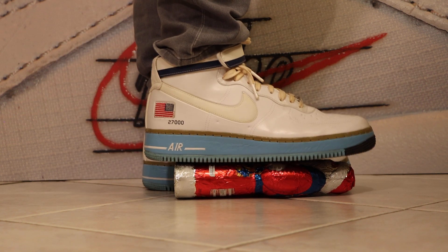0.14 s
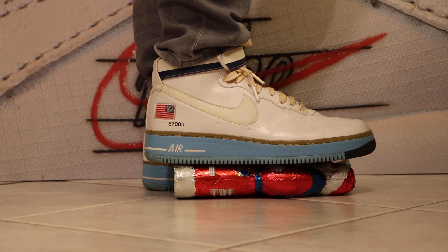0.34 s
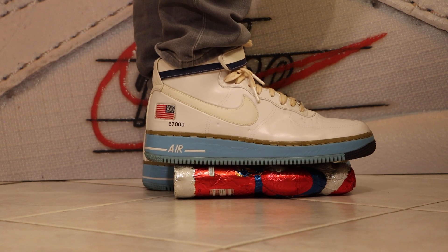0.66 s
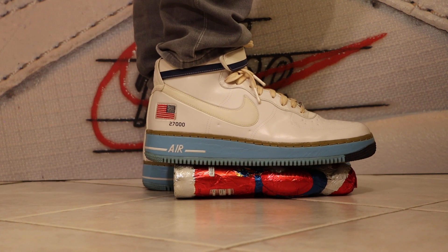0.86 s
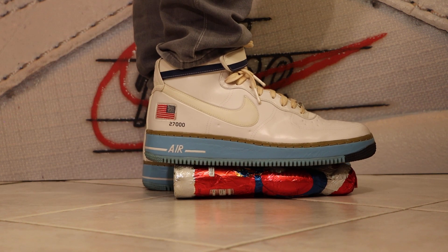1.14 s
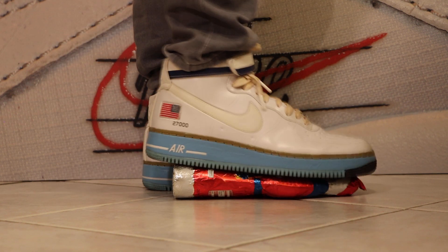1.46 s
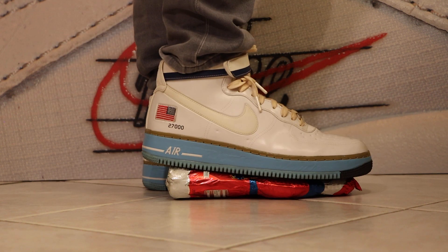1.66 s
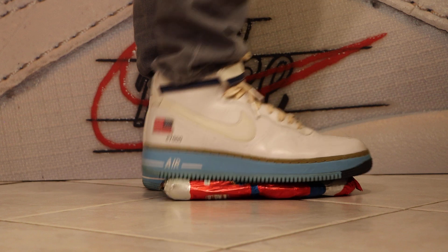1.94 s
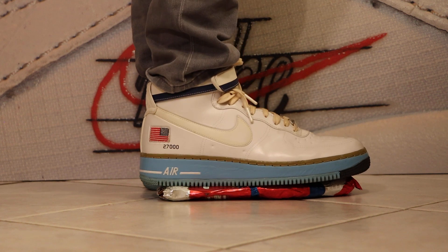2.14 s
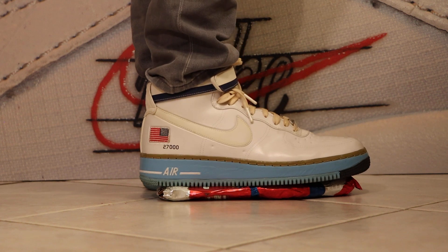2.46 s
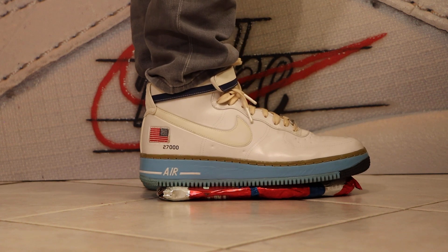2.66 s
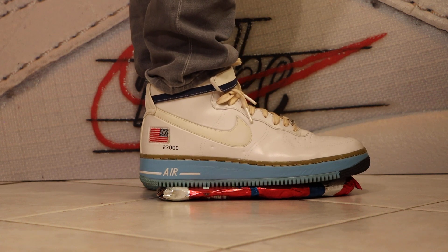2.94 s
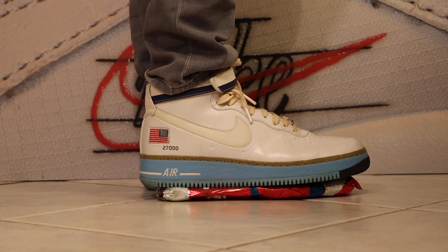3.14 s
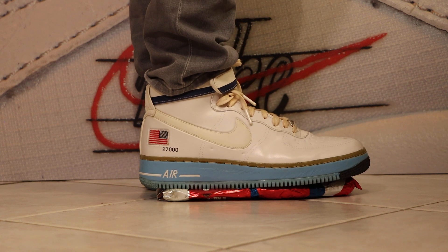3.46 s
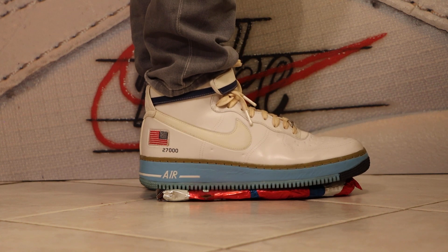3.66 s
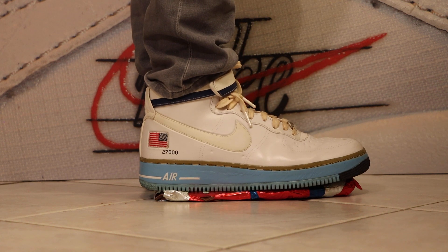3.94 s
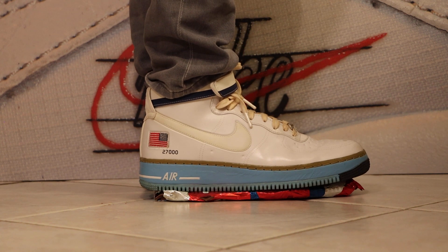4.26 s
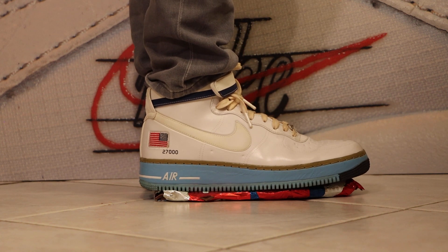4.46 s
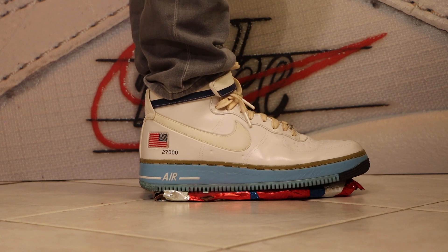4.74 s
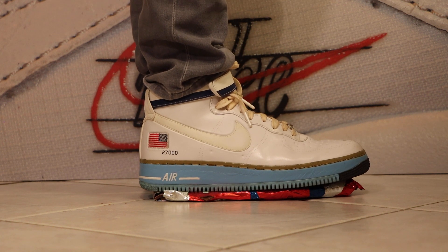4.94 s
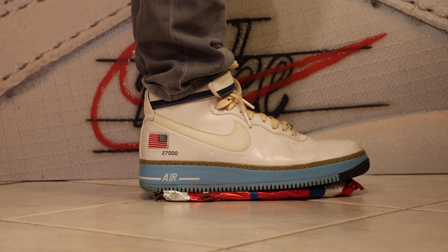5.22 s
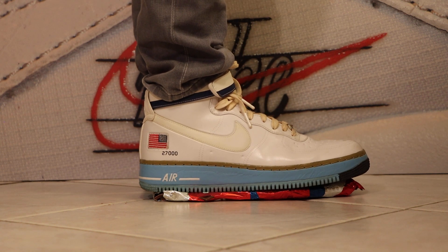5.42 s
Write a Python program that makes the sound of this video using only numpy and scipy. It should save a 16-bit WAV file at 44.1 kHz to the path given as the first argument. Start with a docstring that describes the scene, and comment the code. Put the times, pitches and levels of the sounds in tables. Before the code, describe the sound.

Close, dry snapping and crackling of chocolate breaking inside crinkly foil under a sole, in uneven clusters, in a small hard room.

```python
"""Brittle fracture: a hollow chocolate figure in foil is crushed slowly under a sole on a tiled floor.
Each crack is a short burst of force that excites damped modes of floor, hollow, shell and foil.
Foil creases, crumbling and faint rustling fill the gaps by the same modal synthesis.
A small hard room answers with decaying noise, over steady room tone and hiss;
a close pair of microphones clips on the peaks."""
import sys
import numpy as np
from scipy import signal
from scipy.fft import rfft, irfft
from scipy.io import wavfile

SR = 44100
rng = np.random.default_rng(int(sys.argv[2]) if len(sys.argv) > 2 else 0)


def dump_mix(stems):
    """Bounce the given channels to the path in sys.argv[1] as a 16-bit WAV at rate SR."""
    frames = np.atleast_2d(stems).T  # one column per channel
    limited = np.clip(frames, -1, 1)  # hard clip at full scale
    pcm = np.round(limited * 32767).astype(np.int16)
    wavfile.write(sys.argv[1], SR, pcm)


N = 246519   # length [samples]

# Shell cracks, with the relative drive of each part:
# (time [s], hollow level [dB], shell level [dB], shell pitch [Hz], foil level [dB])
CRACKS = [(0.0, -11, -19.5, 1730, -18.5), (0.2174, -6, -8, 2500, -10), (0.2252, -9.5, -11, 1520, -4),
          (0.2478, -23, -18, 1690, -6), (0.254, -21.5, -11.5, 2200, -3), (0.2673, -13.5, -20, 2250, -6.5),
          (0.2863, -15.5, -17, 1650, -10), (0.2973, -9.5, -7.5, 1840, 0), (0.3067, -24, -12, 1520, -14),
          (0.3271, -12, -15, 1900, -10.5), (0.406, -21.5, -8.5, 1680, -15),
          (0.589, -36.5, -40.5, 2070, -38.5), (0.686, -43, -40, 1550, -25),
          (0.732, -18.5, -18.5, 2210, -12), (0.7617, -15.5, -11.5, 1880, -11),
          (0.926, -11, -20, 1450, -9.5), (0.9349, -26, -23, 1510, -12.5), (0.9612, -20.5, -12.5, 1920, -4),
          (1.0525, -38, -51, 1690, -31), (1.0652, -32.5, -34, 1330, -29), (1.4059, -33, -28, 1950, -13.5),
          (1.4382, -34.5, -35, 1920, -15), (1.4836, -21, -13.5, 1680, -4), (1.497, -13, -4.5, 2010, 2.5),
          (1.515, -24, -18, 1760, -8), (1.5321, -11.5, -7.5, 1980, -4.5), (1.5809, -13.5, -12, 1320, 0.5),
          (1.5938, -30, -21, 1860, -5.5), (1.662, -41, -35, 2110, -14), (1.6844, -21.5, -18, 1220, -8.5),
          (1.8599, -39.5, -35.5, 1270, -35), (1.9606, -10.5, -8.5, 1840, -4),
          (1.985, -14, -9.5, 1540, -1.5), (1.9968, -15, -3, 1950, -3), (2.0215, -9.5, -4, 2150, -3),
          (2.0387, -17, -7, 1940, -1.5), (2.0513, -11.5, -7, 2000, -12), (2.0837, -16.5, -13, 1990, -9),
          (2.093, -24, -9, 2000, -14), (2.1112, -10, -15, 2160, -1.5), (2.1306, -19, -16, 1760, -4.5),
          (2.3091, -22.5, -23, 2040, -20.5), (2.6656, -48.5, -34.5, 2000, -28.5),
          (2.8222, -44, -32.5, 1640, -23), (2.9019, -42.5, -36, 1720, -31), (2.923, -39, -34, 1480, -26),
          (2.938, -32.5, -33, 1950, -32), (2.9472, -38.5, -26, 2360, -20), (3.1361, -37.5, -31, 1480, -27),
          (3.1578, -57, -25, 2460, -12.5), (3.184, -45, -30, 2100, -28), (3.2, -43, -30, 1590, -12.5),
          (3.225, -33, -25, 2010, -18), (3.2408, -42, -28, 1670, -17), (3.3143, -12, -13, 1570, -10),
          (3.3263, -10.5, -20, 2320, -1.5), (3.3317, -13, -11.5, 2060, -4.5),
          (3.3557, -17.5, -14, 1630, -3.5), (3.3825, -31, -20, 2260, -19), (3.46, -31, -33, 1550, -18.5),
          (3.618, -20, -17.5, 1530, -5), (3.6721, -36, -38, 1840, -45), (3.7524, -12, -5.5, 2240, -0.5),
          (3.7859, -12, -16, 1900, -14), (3.7996, -31, -14.5, 2360, -15), (3.8608, -18.5, -13, 1490, -4),
          (3.9132, -12.5, -11, 1870, -5), (3.93, -12.5, -10.5, 1630, -5), (3.9413, -24, -15.5, 1460, -23),
          (4.0054, -11.5, -16.5, 1530, -6), (4.037, -34, -16, 2100, -16), (4.079, -20.5, -21.5, 1440, -15),
          (4.0966, -12, -11.5, 1490, -3.5), (4.1156, -11, -15, 1720, -0.5), (4.1327, -19.5, -19, 2240, -14),
          (4.1519, -23, -13, 1450, -9), (4.2757, -31.5, -25, 1630, -17), (4.3053, -28.5, -28, 1820, -22.5),
          (4.3249, -20, -16.5, 1650, -12), (4.381, -51, -24, 2350, -19), (4.4272, -16.5, -18, 1280, -18),
          (4.5089, -9.5, -5.5, 2020, -8), (4.6141, -23.5, -15.5, 1710, -12), (4.6874, -36, -32, 1460, -34),
          (4.7011, -34, -34, 1860, -25), (4.716, -37, -29, 2250, -25), (4.7504, -31.5, -27.5, 1420, -26),
          (4.786, -42, -30.5, 1650, -24), (4.8237, -25, -20.5, 1560, -16), (4.9619, -36, -30, 1710, -16),
          (4.981, -36, -24, 1350, -22), (5.081, -29.5, -35.5, 1730, -27.5), (5.123, -45, -43, 1500, -42),
          (5.172, -44, -38.5, 1850, -24.5), (5.2194, -32, -21.5, 2500, -4.5), (5.255, -19.5, -15, 1720, -7),
          (5.3287, -34, -19, 1310, -8.5), (5.371, -54, -25, 2330, -45), (5.4318, -20, -16.5, 1610, -11.5),
          (5.4867, -12, -19.5, 1900, -12.5), (5.5152, -15.5, -14.5, 1490, -13.5),
          (5.5428, -19, -19, 1640, -8)]
# Creases of the foil on its own: (time [s], foil level [dB])
CREASES = [(0.0859, -23), (0.1, -33.5), (0.4931, -28), (0.561, -29.5), (0.6142, -28.5), (0.6525, -22),
           (0.675, -24), (0.6998, -30), (0.8166, -16.5), (0.8693, -23), (0.9084, -29), (0.9152, -28),
           (1.1584, -33), (1.1777, -28.5), (1.194, -26), (1.23, -17), (1.2456, -24), (1.2824, -31),
           (1.326, -28), (1.8218, -18.5), (1.888, -21), (1.9, -25), (1.9426, -23), (2.2516, -17.5),
           (2.3866, -29.5), (2.5766, -25.5), (2.606, -31.5), (2.644, -33), (2.7243, -28), (2.793, -22),
           (3.005, -22), (3.0336, -27), (3.0892, -27.5), (3.114, -32), (3.1281, -24.5), (3.151, -14.5),
           (3.1694, -39), (3.2793, -19), (3.4973, -24.5), (3.5288, -15.5), (3.552, -16.5), (3.5889, -26),
           (3.6003, -24), (3.6828, -16.5), (3.6952, -22), (3.73, -21), (3.8274, -15.5), (3.8826, -14),
           (4.0569, -12.5), (4.264, -24), (4.6374, -15.5), (4.8784, -28), (4.9397, -29), (4.9936, -23.5),
           (5.0386, -29), (5.162, -36), (5.1408, -27), (5.1996, -24), (5.3828, -14.5)]
# Modes of floor and sole under the weight: (frequency [Hz], level [dB], decay time t60 [s])
THUD_MODES = [(68.5, -11.5, 0.043), (137, -8.5, 0.051), (169, -1, 0.025), (241.5, 1, 0.037),
              (356, 3.5, 0.015), (385, 7, 0.015), (480, 5, 0.014)]
# Modes of air and fragments under the sole:
# (frequency [Hz], level [dB], decay time t60 [s], left minus right [dB])
HOLLOW_MODES = [(643.6, -4, 0.024, 1.5), (739, 0, 0.017, 7), (855, -1, 0.017, 3.5)]
# Modes of the shell: (frequency [Hz], level [dB], decay time t60 [s], left minus right [dB])
SHELL_MODES = [(1148, -5, 0.018, -12), (1438, 3.5, 0.0078, -7), (1812, -4.5, 0.018, -11),
               (1946, 2, 0.0086, 4), (2494, -4, 0.011, -7.5)]
# Spells of crumbling and faint rustling; the first is the dying ring of a crack before the start.
# Levels are those before the offsets in crumbs():
# (start [s], hold [s], foil level [dB], shell and hollow level [dB], thud level [dB])
SPELLS = [(0.001, 0.011, -55, -37.5, -46), (0.22, 0.15, -36, -50, -27.5), (0.65, .25, -71, -63, -68),
          (0.921, .12, -49, -56, -33.5), (1.16, 0.17, -70, -67, -78), (1.406, .07, -61, -55.5, -64),
          (1.482, 0.18, -29, -35.5, -24), (1.957, 0.088, -20.5, -24.5, -24), (2.797, .25, -66, -65, -80),
          (3.12, 0.13, -52, -52, -72), (3.309, 0.05, -31, -41, -22), (3.44, .16, -56, -66, -64),
          (3.614, 0.077, -52, -51, -39), (3.745, 0.3, -37, -46, -23.5), (4.091, 0.058, -30.5, -36, -22),
          (4.295, 0.46, -45, -61, -43), (4.615, 0.25, -51, -70, -60), (4.951, 0.031, -55, -54, -56),
          (5.13, 0.19, -64, -74, -73), (5.503, 0.078, -49, -56, -36)]
# Reverberation of the room: (frequency [Hz], decay time t60 [s], level [dB])
ROOM_BANDS = [(99.5, 1, -8.5), (297, 0.22, -6.5), (756, 0.28, -9), (1974, 0.28, -5.5), (5070, 0.24, -4.5),
              (13000, 0.15, -3)]
# Spectrum of room tone and hiss: (frequency [Hz], relative density [dB per Hz])
HUSH_SPECTRUM = [(40, -14), (60, 0), (210, -1), (300, -6), (900, -10), (2500, -13), (6000, -17),
                 (16000, -20)]

# How faintly a crease stirs the body, relative to its foil level, and the shell pitch it favours
CREASE_HOLLOW_DB, CREASE_SHELL_DB, CREASE_SHELL_HZ = -29.5, -20, 2320
# Foil pitch when hollow and foil levels are alike, its rise as the hollow takes less part, its spread
FOIL_HZ, FOIL_OCTAVES_PER_DB, FOIL_CHANCE_OCTAVES = 5000, .024, .08
FOIL_CYCLES = 9   # a foil mode falls 60 dB in this many cycles
BODY_CHANCE_DB, FOIL_CHANCE_DB = 1.5, 1.5   # spread of a mode's strength from blow to blow
TEAR_S, CREASE_S = .0025, .0012   # burst time constants: crack with foil at -42.5 dB, crease
SETTLE_DB_PER_S, THUD_FADE_DB_PER_S = 196, 93
APART_HZ = 2070   # well above this the two channels of noise are unrelated
SCATTER_HZ = 3520   # above this the foil sends unlike sound to the two sides of the room
HUSH_DB = -66.5
DIP_HZ, DIP_Q = 1032, 21
CUTOFF_HZ = 16250   # stopband edge of the final low-pass


def cracks():
    """Brittle fracture: cracks and creases release bursts; stronger cracks tear on a little longer."""
    creases = [(s, db + CREASE_HOLLOW_DB, db + CREASE_SHELL_DB, CREASE_SHELL_HZ, db)
               for s, db in CREASES]
    s, hollow_db, shell_db, shell_hz, foil_db = np.transpose(CRACKS + creases)
    octaves = FOIL_OCTAVES_PER_DB * (foil_db - hollow_db)
    octaves = octaves + rng.normal(0, FOIL_CHANCE_OCTAVES, len(s))
    foil_hz = FOIL_HZ * 2 ** octaves
    last_s = TEAR_S * from_db(0.079 * (foil_db + 42.5))
    last_s[len(CRACKS):] = CREASE_S
    start_s = s - .0003   # bursts start slightly ahead of the listed times
    thud_db = hollow_db - 22
    return breaking(start_s, thud_db, hollow_db, shell_db, shell_hz, foil_db, foil_hz, last_s, size=256)


def breaking(s, thud_db, hollow_db, shell_db, shell_hz, foil_db, foil_hz, last_s, size):
    """Modal superposition: every fracture drives floor, hollow, shell and foil modes.
    Neighbouring modes swing in opposite senses, so no gaps open between them."""
    count = len(s)
    places, bursts = fractures(s, last_s, size)
    # the stiff parts feel one short blow, of one sign and unit impulse
    at, blows = fractures(s, last_s * 0.075, size=24)
    blows = np.abs(blows) / np.sum(np.abs(blows), axis=1, keepdims=True)
    blows = blows * rng.choice([-1, 1], (count, 1))
    late = at + round(0.001165 * SR)   # floor and hollow speak just after the snap
    out = thud(late, blows, thud_db) + hollow(late, blows, hollow_db)
    out = out + shell(at, blows, shell_db, shell_hz)
    other_bursts = fractures(s, last_s, size)[1]
    return out + foil(places, bursts, other_bursts, foil_db, foil_hz)


def fractures(s, last_s, size):
    """Impulsive release: each burst of uneven force decays exponentially and has energy 1."""
    t = np.arange(size) / SR
    bursts = rng.laplace(size=(len(s), size)) * np.exp(-t / last_s[:, None])
    places = np.round(np.maximum(s, 0) * SR).astype(int)[:, None] + np.arange(size)
    return places.ravel(), bursts / np.sqrt(np.sum(bursts ** 2, axis=1, keepdims=True))


def strike(places, bursts, gains):
    """Superposition of forces: scaled bursts add at their sample places."""
    return np.bincount(places, (bursts * gains[:, None]).ravel(), N + 512)[:N]


def ring(force, hz, t60):
    """Damped resonance: a unit click rings at a height near 1; steady force radiates nothing."""
    r, w = from_db(-60 / (t60 * SR)), 2 * np.pi * hz / SR
    return signal.lfilter([.5, 0, -.5], [1, -2 * r * np.cos(w), r * r], force + 1e-18)


def near(hz, pitch_hz, octaves):
    """Selective excitation: a mode weakens [dB] with the square of its distance from the pitch."""
    return -6 * (np.log2(hz / pitch_hz) / octaves) ** 2


def pan(pan_db):
    """Intensity stereophony: a level difference is shared between left and right."""
    return from_db([[pan_db / 2], [-pan_db / 2]])


def hollow(places, blows, level_db):
    """Enclosed resonance: air and fragments under the sole ring at a few low modes."""
    out = np.zeros((2, N))
    for k, (hz, db, t60, pan_db) in enumerate(HOLLOW_MODES):
        gains = from_db(level_db + db + rng.normal(0, BODY_CHANCE_DB, len(blows)))
        out += (-1) ** k * ring(strike(places, blows, gains), hz, t60) * pan(pan_db)
    return out


def shell(places, blows, level_db, pitch_hz):
    """Plate vibration: fragments ring most strongly in the shell modes near their own pitch."""
    out = np.zeros((2, N))
    for k, (hz, db, t60, pan_db) in enumerate(SHELL_MODES):
        chance_db = rng.normal(0, BODY_CHANCE_DB, len(blows))
        gains = from_db(level_db + db + near(hz, pitch_hz, 0.52) + chance_db)
        out += (-1) ** k * ring(strike(places, blows, gains), hz, t60) * pan(pan_db)
    return out


def foil(places, bursts, other_bursts, level_db, pitch_hz):
    """Thin-sheet radiation: damped high modes, radiated more unevenly to the sides as pitch rises."""
    out = np.zeros((2, N))
    for k, hz in enumerate(np.geomspace(2950, 15000, 16)):
        chance_db = rng.normal(0, FOIL_CHANCE_DB, len(bursts))
        gains = from_db(level_db - 3.2 + near(hz, pitch_hz, 1.22) + chance_db)
        mid, side = strike(places, bursts, gains), strike(places, other_bursts, gains)
        spread = 0.99 * (hz / 6000) ** 0.8
        force = np.array([mid + spread * side, mid - spread * side])
        out += (-1) ** k * ring(force, hz, FOIL_CYCLES / hz)
    return out


def thud(places, blows, level_db):
    """Impact response: floor and sole ring at low modes, equally in both channels."""
    out = np.zeros((2, N))
    for k, (hz, db, t60) in enumerate(THUD_MODES):
        gains = from_db(level_db + db + rng.normal(0, 2 * BODY_CHANCE_DB, len(blows)))
        out += (-1) ** k * ring(strike(places, blows, gains), hz, t60)
    return out


def crumbs(count=10000, uneven_db=3.5):
    """Random granular excitation: many small bursts of random pitch, few large and many faint."""
    s, faint, body, shell_chance, foil_chance = rng.random((count, 5)).T
    s = s * (N - 1) / SR
    foil_db, body_db, thud_db = crumbling(s) - uneven_db * np.log(faint + .01)
    hollow_db = body_db + 12 * (body - .5) - 15
    shell_hz, foil_hz = 1200 * 2.2 ** shell_chance, 3200 * 4.2 ** foil_chance
    last_s = np.full(count, .0005)
    return breaking(s, thud_db - 25.0, hollow_db, hollow_db - .1, shell_hz, foil_db - 4, foil_hz,
                    last_s, size=32)


def crumbling(s):
    """Exponential decay: in each spell foil, body and thud levels [dB] start at once, hold, then settle.
    The thud also fades from the start; the highest level of all spells prevails."""
    start, hold, *peaks = np.transpose(SPELLS)[:, :, None]
    since = s - start
    settle = SETTLE_DB_PER_S * np.maximum(since - hold, 0)
    losses = np.array([settle, settle, settle + THUD_FADE_DB_PER_S * since])
    return np.where(since >= 0, peaks - losses, -200).max(axis=1)


def room(x):
    """Reverberation: dense reflections decay band by band, with differing tails in the two channels."""
    size, gap = SR // 2, round(.003 * SR)
    hz, t60, db = np.transpose(ROOM_BANDS)
    white = [irfft(pair_noise(size), size) for turn in range(2)]   # neighbouring bands alternate
    t = np.arange(size) / SR
    tail, edges = np.zeros((2, size)), 50 * 2 ** np.arange(0, 8.6, .5)   # half-octave bands
    for k, (low, high) in enumerate(zip(edges, edges[1:])):
        centre = np.sqrt(low * high)
        band_pass = signal.butter(2, [low, high], "band", fs=SR, output="sos")
        band = signal.sosfilt(band_pass, white[k % 2])
        decay = from_db(-60 * t / at_hz(centre, hz, t60))
        tail += from_db(at_hz(centre, hz, db)) * band * decay / np.sqrt(2 * np.sum(decay ** 2))
    # the room receives one common bass and a separate treble on each side
    mid = x.mean(axis=0)
    treble = signal.butter(4, SCATTER_HZ, "high", fs=SR, output="sos")
    sent = mid + signal.sosfilt(treble, x - mid)
    wet = signal.fftconvolve(tail, sent, axes=1)
    return np.pad(wet, ((0, 0), (gap, 0)))[:, :N]


def hush():
    """Stationary noise: shaped room tone and microphone hiss."""
    hz, db = np.transpose(HUSH_SPECTRUM)
    shape = from_db(at_hz(np.fft.rfftfreq(N, 1 / SR), hz, db))
    noise = irfft(pair_noise(N) * shape, N)
    return from_db(HUSH_DB) * noise / np.std(noise)


def pair_noise(size):
    """Spatial coherence: stereo noise spectra are alike in the bass and unrelated in the treble."""
    mid, side = rfft(rng.standard_normal((2, size)))
    alike = 1 / (1 + (np.fft.rfftfreq(size, 1 / SR) / APART_HZ) ** 2)
    return np.sqrt(1 + alike) * mid + np.sqrt(1 - alike) * side * [[1], [-1]]


def from_db(db):
    """Logarithmic level: decibels become an amplitude ratio."""
    return 10 ** (np.asarray(db) / 20)


def at_hz(hz, points_hz, values):
    """Logarithmic frequency: values are interpolated along a log-frequency axis."""
    return np.interp(np.log(np.maximum(hz, 1)), np.log(points_hz), values)


def scene():
    """Superposition of direct, reflected and steady sound; the left path is one sample longer."""
    direct = cracks() + crumbs()
    direct[0] = np.roll(direct[0], 1)
    return direct + room(direct) + hush()


def record(dry):
    """Transduction: the housing makes a dip near 1 kHz, band edges roll off and peaks clip hard."""
    notched = signal.lfilter(*signal.iirnotch(DIP_HZ, DIP_Q, fs=SR), dry)
    heard = notched * 1.524 + dry * 0.94   # the unnotched share keeps the dip shallow
    heard = signal.sosfilt(signal.butter(4, 13300, fs=SR, output="sos"), heard)
    heard = signal.sosfilt(signal.butter(2, 60, "high", fs=SR, output="sos"), heard)
    clipped = np.clip(heard, -1, 1)
    return signal.sosfilt(signal.cheby2(12, 60, CUTOFF_HZ, fs=SR, output="sos"), clipped)


dry = scene()
out = record(dry)
dump_mix(out)
```